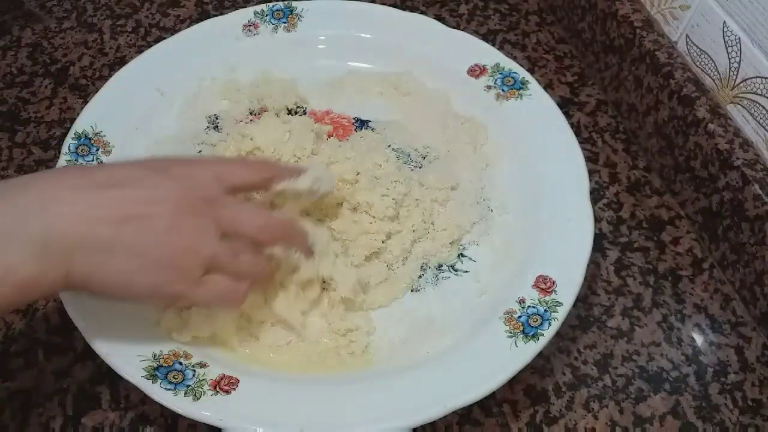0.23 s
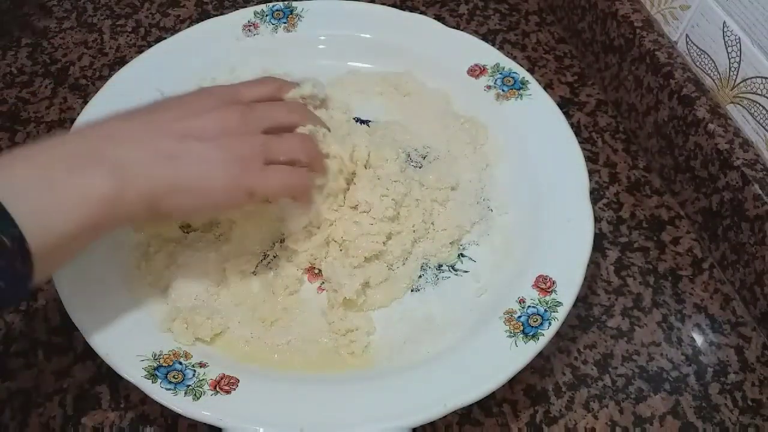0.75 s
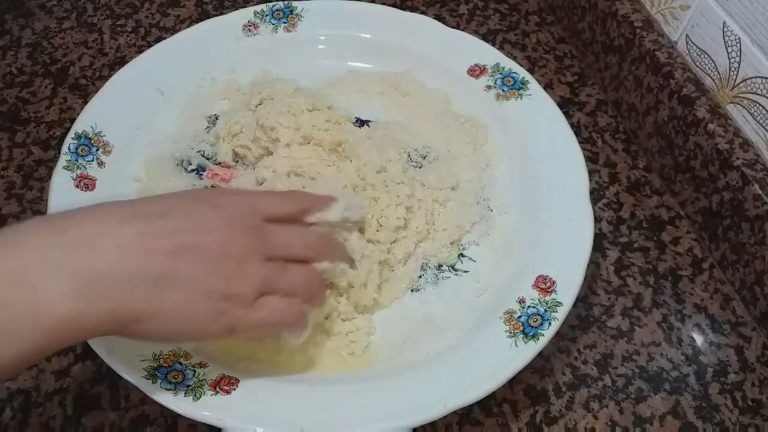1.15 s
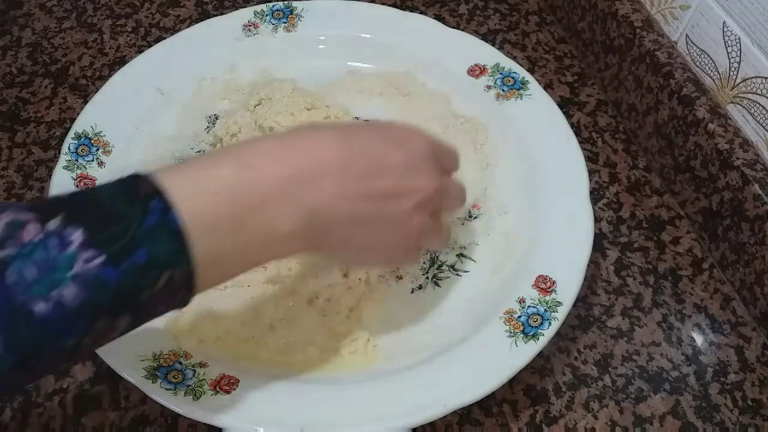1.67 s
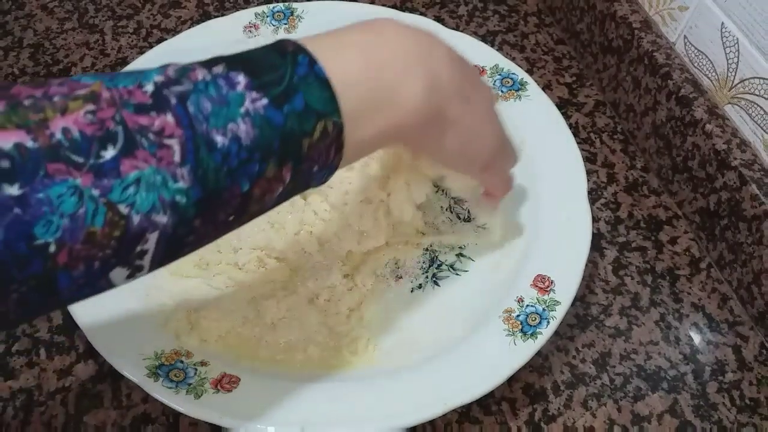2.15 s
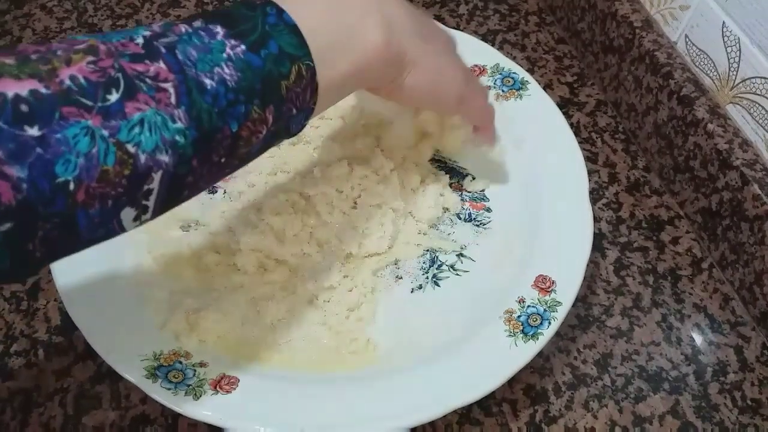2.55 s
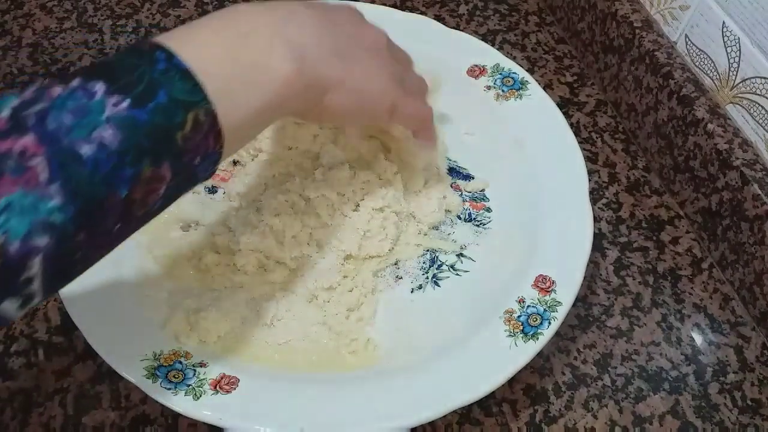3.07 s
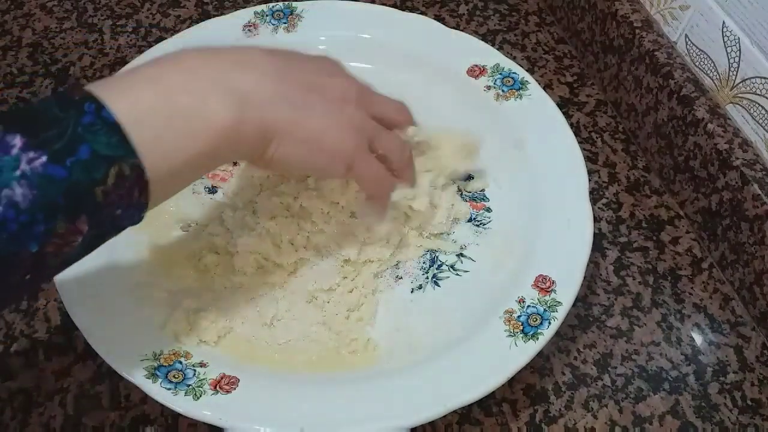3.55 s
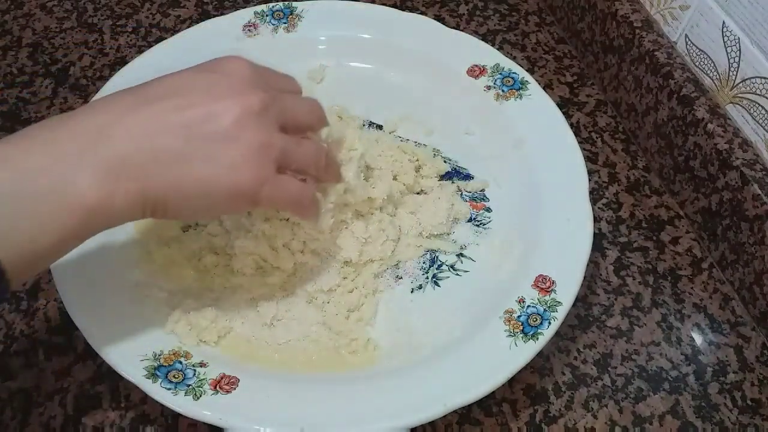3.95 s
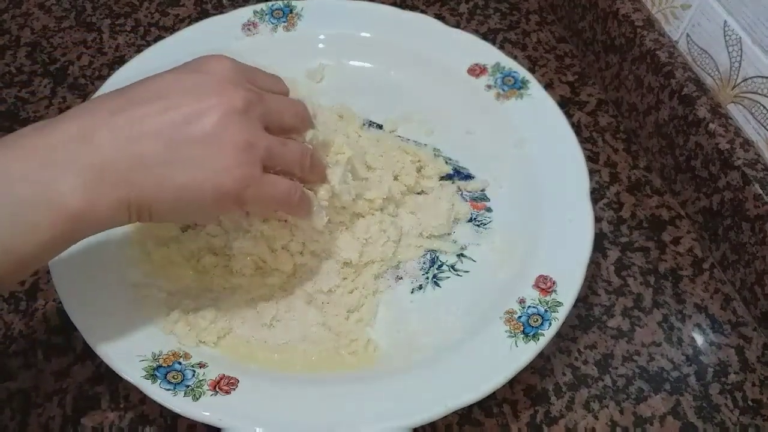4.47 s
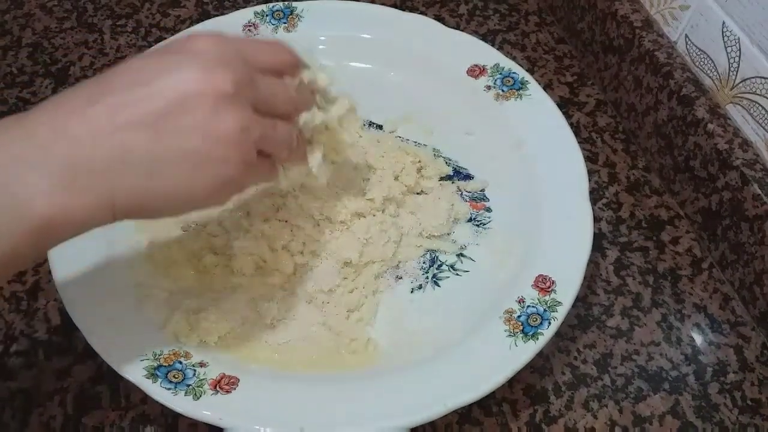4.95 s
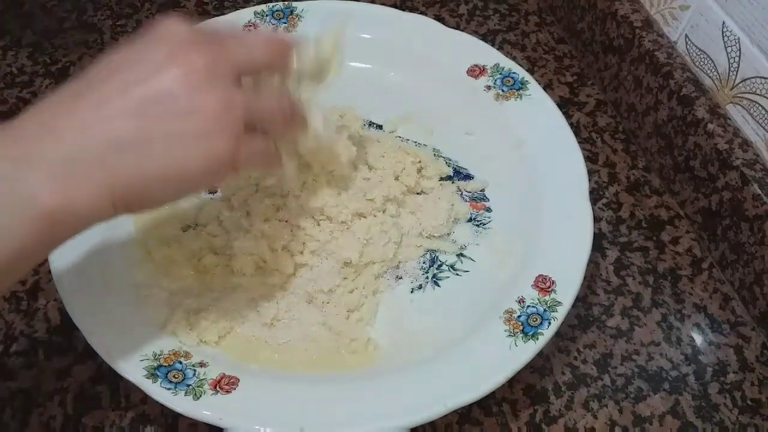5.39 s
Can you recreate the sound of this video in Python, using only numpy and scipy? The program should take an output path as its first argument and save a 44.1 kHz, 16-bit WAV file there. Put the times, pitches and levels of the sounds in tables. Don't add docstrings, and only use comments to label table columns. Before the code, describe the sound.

In a small kitchen, a hand rubs damp crumbs on a ceramic plate in uneven, hissing strokes, with faint glassy ringing and an occasional tiny snap. The counter rumbles and creaks softly, with dull knocks. Near the end come two loud, bouncing thumps with a short room echo, then quiet rubbing. A refrigerator hums low. Close, small microphone.

```python
import sys
import numpy as np
from scipy import signal
from scipy.fft import rfft, irfft, next_fast_len
from scipy.io import wavfile

SR = 44100
rng = np.random.default_rng(int(sys.argv[2]) if len(sys.argv) > 2 else 0)


def invert_db(x):
    u = np.asarray(x, float) / 20
    return 10 ** u


def dump_mix(stems):
    frames = np.atleast_2d(stems).T
    limited = np.clip(frames, -1, 1)
    pcm = np.round(limited * 32767).astype(np.int16)
    wavfile.write(sys.argv[1], SR, pcm)


N = 247907
TIME = np.arange(N) / SR

# time in seconds, then levels in dB of the sharp crack,
# the cabinet boom, the counter panel and the plate rattling in its seat.
KNOCKS = [(2.956, -80, -36, -54, -60), (3.669, -85, -51, -64, -61), (3.704, -94, -46, -73, -67),
          (3.788, -60.5, -48, -44, -41), (3.812, -79, -69, -39.5, -65), (4.362, -70, -56, -53, -50),
          (4.458, -37.5, -38, -43, -45), (4.464, -21.5, -39.5, -29, -41),
          (4.4668, -18.5, -34.5, -17.5, -19.5), (4.4708, -21, -46, -14.5, -37),
          (4.5222, -29.5, -24, -26.5, -40), (4.5266, -47, -18.5, -18, -25), (4.808, -20, -17.5, -17.5, -34),
          (4.8116, -42, -24.5, -25.5, -9.5), (4.8818, -33.5, -30.5, -26, -31.5)]


def rubbing():
    # time of greatest speed in seconds, rise in seconds, fall in seconds,
    # crumb hiss in dB, weight on the plate in dB.
    strokes = [(0.0, .05, 0.12, -70.5, -16), (.32, 0.14, 0.26, -64, 3.5), (.49, 0.023, .08, -70, 0),
               (0.839, 0.13, .14, -65.5, 3.5), (1.261, 0.11, 0.23, -62, 1.5), (1.46, .06, 0.1, -68.5, -26),
               (1.61, 0.059, 0.068, -61, -3.5), (1.673, 0.044, 0.05, -54, 2.5), (1.75, 0.15, 0.1, -68, 2),
               (1.93, 0.036, 0.048, -65, -11), (2.064, 0.11, .08, -60, -0.5), (2.17, .05, 0.18, -71.5, -7),
               (2.36, 0.088, 0.15, -66.5, -2.5), (2.499, .1, 0.12, -59, 1), (2.77, 0.04, .06, -72, -4),
               (2.91, .12, 0.21, -64, -7), (3.29, .12, 0.15, -63.5, -5.5),
               (3.711, 0.089, 0.17, -65.5, -9.5), (3.97, 0.072, 0.034, -77.5, -3),
               (4.365, 0.051, 0.1, -61.5, 1.5), (5.116, 0.019, 0.083, -61.5, -20),
               (5.195, 0.057, 0.058, -58, -1.5), (5.25, .08, 0.31, -70, 11), (5.42, 0.27, 0.37, -73.5, 0)]
    # time in seconds, rise in seconds, fall in seconds, level in dB.
    rim_drags = [
        (.86, 0.086, 0.056, -74),
        (2.05, 0.09, 0.14, -59.5),
        (2.1, 0.059, 0.16, -64.5),
    ]
    # time in seconds, share of bare glaze (0-1), reach from centre to rim (0-1).
    places = [(.3, .6, 0), (.85, 0.43, 0), (1.15, 0.83, 0.5), (1.45, 0.8, 0.1), (1.67, 0.45, 0.46),
              (2.05, 0.8, 0.75), (2.5, 0.8, 0.67), (2.9, .43, .6), (3.3, 0.25, 0.17), (3.8, 0.2, 0.5),
              (4.4, 0.12, 0.54), (5.12, 0, .05), (5.2, 0, 1), (5.501, 0.3, 0.14)]
    # frequency in Hz, width in Hz, level in dB.
    low_modes = [(2020, 160, -7), (2210, 120, 0)]
    mid_modes = [(2767, 58, -5), (3240, 340, 1), (3485, 120, -0.5), (3870, 300, -1), (4380, 43, -13)]
    high_modes = [(4590, 300, 12.5), (5300, 220, -9), (5870, 75, 6), (7200, 1100, 10.5), (8120, 320, 10)]
    rim_modes = [(720, 96, -3.5), (955, 22, -0.5), (1190, 150, -6)]
    # frequency in Hz, level in dB per Hz.
    dust_spectrum = [(5060, -40), (8600, -11.5), (9840, -10.5), (13100, -10.5), (15800, -19)]

    s, bare, reach = np.transpose(places)
    bare = np.clip(np.interp(TIME, s, bare), 0, 1)
    reach = np.interp(TIME, s, reach)
    weight_db = np.array(strokes)[:, 4]
    crumbs = grains(9000, spread_db=0.6)
    flicker = invert_db(0.6 * drift(15))

    lowest = plate(crumbs, bare, [(1450, 70, 0)], 954, 2310)
    ringing = plate(crumbs, bare, low_modes, 1480, 2970) + invert_db(-3.5 - 5.5 * reach) * lowest
    coarse = plate(crumbs, bare, mid_modes, 2660, 4510)
    hiss = plate(crumbs, bare / 2, high_modes, 4670, 9860)
    dust = invert_db(-11.5 + 7 * reach) * colour(crumbs, dust_spectrum)

    mix = swells(strokes) * (hiss + dust)
    mix += swells(strokes, -1.5 + 0.38 * weight_db, lag=0.0069) * coarse
    mix += swells(strokes, -7 + weight_db, lag=0.02, lingers=0.75, builds=0.93) * ringing
    drag = swells(rim_drags) * body(grains(4000, spread_db=-3.0), rim_modes)
    return flicker * mix + drag


def plate(crumbs, bare, peaks, low_hz, high_hz):
    # frequency in Hz, level in dB per Hz.
    hiss_spectrum = [(700, -40), (1150, -10.5), (2200, -1.5), (3000, -6.5), (4300, 0), (8200, -5.5),
                     (9300, -27), (12000, -43)]
    heap, glaze = (np.roll(crumbs, shift) for shift in rng.integers(N, size=2))
    heap = band(colour(heap, hiss_spectrum), low_hz, high_hz)
    glaze = band(body(glaze, peaks, wander_db=1.6), low_hz, high_hz)
    return np.sqrt(1 - bare) * heap + np.sqrt(bare) * glaze


def cracks():
    # time in seconds, peak level in dB, length in seconds.
    crumb_snaps = [
        (0.261, -48, .001),
        (0.281, -39, 0.00084),
        (2.018, -52.5, .005),
        (3.786, -56, 0.031),
        (4.3231, -62, .006),
        (4.369, -55, 0.013),
        (4.766, -55.5, 0.046),
        (5.117, -55, 0.0093),
        (5.156, -57, 0.0025),
        (5.1922, -45, 0.0048),
    ]
    # frequency in Hz, level in dB per Hz.
    crack_spectrum = [(410, -35.5), (700, -17.5), (1180, -16.5), (2080, -4.5), (2840, -10), (3940, -2),
                      (4860, -6), (5400, -4), (8310, -11), (16000, -31.5)]
    noise = colour(rng.standard_normal(N), crack_spectrum)
    hard = noise * sum(burst(s, db - 2.5, 0.0034) for s, db, *rest in KNOCKS)
    snaps = sum(burst(s, db - 3, length) for s, db, length in crumb_snaps)
    snaps = band(noise, 2600, 15000) * snaps
    return signal.sosfilt(signal.cheby2(10, 50, 16700, fs=SR, output="sos"), hard + snaps)


def burst(s, level_db, length):
    out, at = np.zeros(N), int(s * SR)
    age = TIME[:min(SR // 5, N - at)]
    out[at:at + len(age)] = invert_db(level_db) * (1 - np.exp(-age / 0.00027)) * np.exp(-age / length)
    return out


def knocks():
    # frequency in Hz, level in dB, time to fall by 60 dB in seconds.
    boom_modes = [(84, -5.5, 0.18), (100.8, -5, 0.61), (130, -11.5, 0.075)]
    panel_modes = [(159, -37.5, 0.27), (212, -1, 0.087), (365, 3, 0.057), (545, -7.5, 0.069),
                   (854, -12.5, 0.05)]
    seat_modes = [(215, -11, .14), (292, -1, .065), (415, 3.5, .07), (600, -7, .05)]
    out, table = np.zeros(N), np.array(KNOCKS)
    for column, modes, delay in [(2, boom_modes, 0.003), (3, panel_modes, 0), (4, seat_modes, 0)]:
        at = ((table[:, 0] + delay) * SR).astype(int)
        for hz, db, t60 in modes:
            push = np.full(N, 1e-18)
            push[at] = invert_db(table[:, column] + db - 6.5 + rng.standard_normal(len(at)))
            r = invert_db(-60 / (t60 * SR))
            w = 2 * np.pi * hz / SR
            out += signal.lfilter([0, np.sin(w)], [1, -2 * r * np.cos(w), r * r], push)
    return signal.lfilter([0.1], [1, -0.9], out)


def shifting():
    # time in seconds, rise in seconds, fall in seconds,
    # rumble level in dB, creak in dB relative to the rumble.
    shifts = [(2.32, 0.04, 0.1, -71, -7), (2.44, 0.015, 0.23, -68, 0.5), (3.0, 0.029, 0.019, -57, -32),
              (3.07, .05, 0.15, -65, -2), (3.26, 0.081, 0.075, -76, 2.5), (3.402, 0.013, 0.11, -69, -15),
              (3.682, 0.032, 0.082, -56, -35), (3.791, 0.013, 0.1, -51.5, -10),
              (3.97, 0.11, 0.079, -62, -10), (4.2, 0.26, .08, -68.5, -12), (4.375, 0.11, .12, -53.5, -11.5),
              (5.066, .08, 0.094, -61, -31), (5.23, 0.077, 0.096, -65, 0.5), (5.33, 0.053, 0.12, -65.5, -8)]
    # frequency in Hz, level in dB per Hz.
    load_spectrum = [(35, -44), (60, -2.5), (162, -8), (237, -10.5), (303, -3.5), (480, -18), (620, -58),
                     (1060, -120)]
    # frequency in Hz, width in Hz, level in dB.
    creak_modes = [(511, 28, 0), (688, 78, -1.5), (820, 280, -6.5)]
    noise = rng.standard_normal((2, N))
    creak_db = np.array(shifts)[:, 4]
    rumble = swells(shifts) * colour(noise[0], load_spectrum)
    creak = swells(shifts, creak_db) * body(noise[1], creak_modes)
    lumps = invert_db(1.48 * drift(15.0))
    return lumps * (rumble + creak)


def kitchen(hits, spectrum):
    # frequency in Hz, time to fall by 60 dB in seconds.
    room_t60 = [(60, 0.71), (250, 0.65), (1000, 0.47), (4000, 0.56), (7000, 0.6), (10000, 0.36),
                (15000, 0.33)]
    age = TIME[:SR * 2 // 3]
    white = rng.standard_normal((2, SR))
    edges = 55 * 2 ** np.arange(0, 8.5, 1 / 3)
    noise = []
    for k, (low, high) in enumerate(zip(edges, edges[1:])):
        sos = signal.butter(2, [low, high], "band", fs=SR, output="sos")
        noise.append(signal.sosfilt(sos, white[k % 2]))
    noise = np.array(noise)
    hz = np.sqrt(edges[:-1] * edges[1:])[:, None]
    dying = invert_db(at_hz(spectrum, hz) - 60 * age / at_hz(room_t60, hz))
    power = np.sum(noise.var(axis=1) * np.mean(dying ** 2, axis=1))
    scale = (1 - np.exp(-age / 0.0021)) / 6 / np.sqrt(power)
    out = np.zeros(N + SR)
    for (s, gain), skip in zip(hits, rng.integers(500, SR // 3, len(hits))):
        tail = np.sum(noise[:, skip:skip + len(age)] * dying, axis=0)
        at = int(s * SR)
        out[at:at + len(age)] += gain * scale * tail
    return out[:N]


def tail_gain(knock):
    return invert_db(knock[1] - 12) + invert_db(knock[2] - 20)


def background():
    # frequency in Hz, level in dB.
    hum_lines = [(48.4, -75), (96.9, -79.5), (145.3, -75), (269.2, -83.5), (301.5, -78), (538.3, -79)]
    # phase wander in radians for the first, width in Hz for the others.
    hum_widths = [0.33, 7.4, 7.1, 9.2, 3, 6.7]
    # frequency in Hz, level in dB per Hz.
    air_spectrum = [(36, -39.5), (62, 0.5), (150, -2), (223, -9), (294, -6), (417, -10.5), (538, -10),
                    (604, -12.5), (962, -18), (1680, -23), (3700, -22.5), (7610, -26.5), (9160, -31),
                    (14900, -28), (16000, -48)]
    hum = np.zeros(N)
    for (hz, db), width in zip(hum_lines[1:], hum_widths[1:]):
        hum += invert_db(db) * resonate(rng.standard_normal(N), hz, width)
    hz, db = hum_lines[0]
    phase = 2 * np.pi * hz * TIME + hum_widths[0] * drift(3.3)
    hum += invert_db(db) * np.sqrt(2) * np.sin(phase)
    return hum + invert_db(-70.5) * colour(rng.standard_normal(N), air_spectrum)


def swells(rows, gain_db=0, lag=0, lingers=1, builds=1):
    s, rise, fall, db = np.transpose(rows)[:4, :, None]
    coarse_time = TIME[::128]
    age = coarse_time - s - lag
    part = np.maximum(-age / (rise * builds), age / (fall * lingers))
    loss_db = 11.5 * part + 34 * np.maximum(part - 1, 0)
    level = invert_db(db + np.reshape(gain_db, (-1, 1)) - loss_db)
    return np.interp(TIME, coarse_time, np.sqrt(np.sum(level ** 2, axis=0)))


def grains(per_s, spread_db):
    sizes = invert_db(spread_db * np.minimum(rng.exponential(1, N), 4)) * rng.standard_normal(N)
    return rms_one(sizes * (rng.random(N) < per_s / SR))


def body(x, peaks, wander_db=0):
    out = np.zeros(N)
    for k, (hz, width_hz, db) in enumerate(peaks):
        sign = (-1) ** k
        out += sign * invert_db(db + wander_db * drift(8.2)) * resonate(x, hz, width_hz)
    return rms_one(out)


def resonate(x, hz, width_hz):
    r = np.exp(-np.pi * width_hz / SR)
    return rms_one(signal.lfilter([1, 0, -1], [1, -2 * r * np.cos(2 * np.pi * hz / SR), r * r], x))


def drift(rate):
    r = np.exp(-2 * np.pi * rate / SR)
    return rms_one(signal.lfilter([1], [1, -2 * r, r * r], rng.standard_normal(N + SR))[SR:])


def colour(x, spectrum):
    size = next_fast_len(len(x))
    gain = invert_db(at_hz(spectrum, np.fft.rfftfreq(size, 1 / SR)))
    return rms_one(irfft(rfft(x, size) * gain, size)[:len(x)])


def at_hz(points, hz):
    table = np.array(points)
    return np.interp(np.log(hz + 1), np.log(table[:, 0]), table[:, 1])


def band(x, low_hz, high_hz):
    return rms_one(signal.sosfilt(signal.butter(3, [low_hz, high_hz], "band", fs=SR, output="sos"), x))


def rms_one(x):
    return x / np.sqrt(np.mean(x ** 2) + 1e-30)


def scene():
    # frequency in Hz, level in dB per Hz.
    tails = [
        [(32, -32), (55, -13), (164, -5), (311, -19), (591, -11.5), (749, -22), (1460, -23), (1800, -26.5),
         (2030, -23), (2450, -28), (4040, -21), (6490, -28), (16000, -46)],
        [(32, -31), (55, 1.5), (270, 2), (649, -4.5), (995, -16), (2510, -20.5), (3190, -36), (4040, -16),
         (4880, -27.5), (8040, -26.5), (9050, -34.5), (14900, -26.5), (16000, -35)],
    ]
    last_thump_s = 4.7
    early = [(k[0], tail_gain(k)) for k in KNOCKS if k[0] < last_thump_s]
    late = [(k[0], tail_gain(k)) for k in KNOCKS if k[0] > last_thump_s]
    echo = kitchen(early, tails[0]) + kitchen(late, tails[1])
    high_pass = signal.butter(6, 74, "high", fs=SR, output="sos")
    counter = signal.sosfilt(high_pass, knocks() + echo + shifting())
    size = next_fast_len(N)
    steady = rfft(rubbing() + counter + background(), size)
    below_top = np.fft.rfftfreq(size, 1 / SR) < 15800
    steady = irfft(steady * below_top, size)[:N]
    return (steady + cracks())[None]


def band_limit(x):
    return signal.sosfilt(signal.butter(12, 16500, fs=SR, output="sos"), x)


def record(dry):
    return band_limit(dry)


dry = scene()
out = record(dry)
dump_mix(out)
```